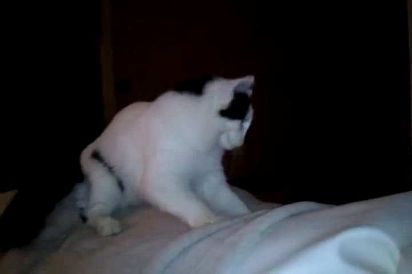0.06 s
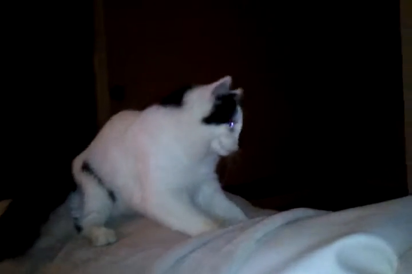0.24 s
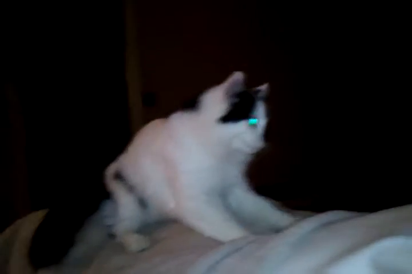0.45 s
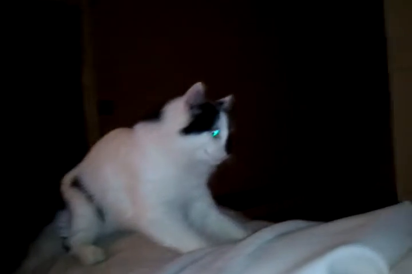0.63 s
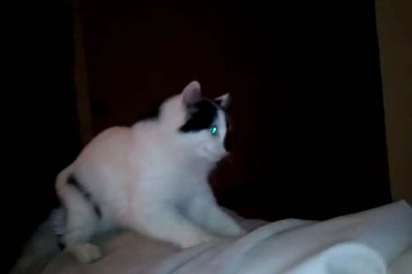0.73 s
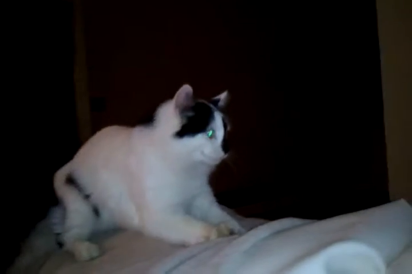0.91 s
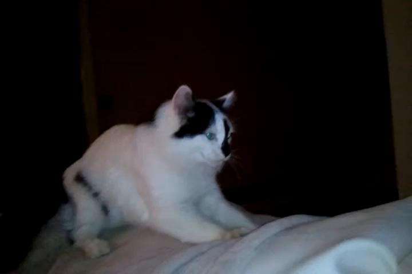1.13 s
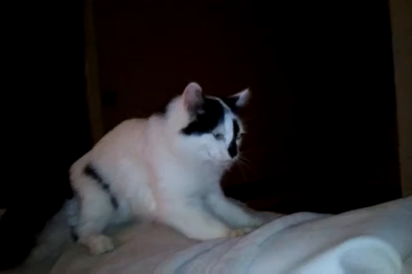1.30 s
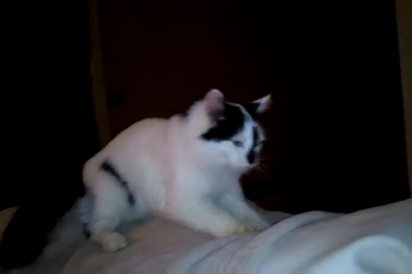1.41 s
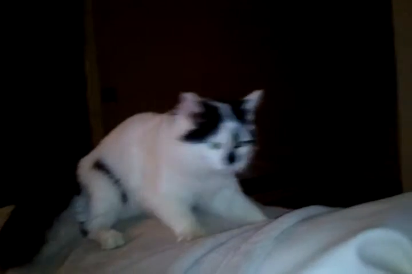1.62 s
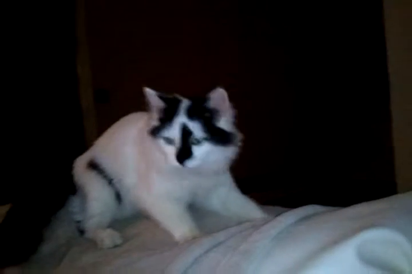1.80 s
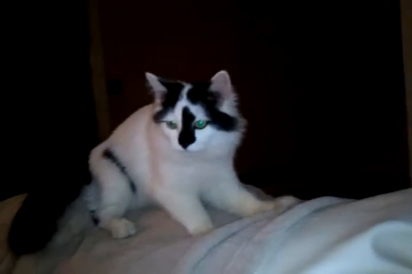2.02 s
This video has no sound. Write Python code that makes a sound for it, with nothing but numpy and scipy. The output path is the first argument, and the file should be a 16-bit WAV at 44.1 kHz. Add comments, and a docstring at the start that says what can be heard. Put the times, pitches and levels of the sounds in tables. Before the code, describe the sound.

Faint cat purring in a quiet room, then a sharp bright scrape of paw on cloth with a weaker second stroke; afterwards the steady purr, low rumble and hiss are clearer, dotted with dry claw clicks.

```python
"""A cat purrs with a low flutter, built from wavering overtones, while it kneads a blanket in a quiet room.
A paw drags over the cloth in two scratchy strokes, made of many tiny thread slips and narrow swishes.
Claws tick as they catch in the weave, and pressing paws give soft low thumps.
Behind them lie rumble and hiss, and a faint ringing that fades away.
The loud scraping opens the recorder's noise gate, so purr and room hiss come up and stay."""
import sys
import numpy as np
from scipy import signal
from scipy.fft import rfft, irfft, next_fast_len
from scipy.io import wavfile
from scipy.ndimage import uniform_filter1d

SR = 44100
rng = np.random.default_rng(int(sys.argv[2]) if len(sys.argv) > 2 else 0)


def materialize(psi):
    """Save the field psi as 16-bit PCM at rate SR to the path in sys.argv[1].

    A 1-D psi becomes a single channel; in a 2-D psi each row is a channel.
    """
    bounded = np.clip(np.atleast_2d(psi).T, -1, 1)
    quanta = np.round(bounded * 32767).astype(np.int16)
    wavfile.write(sys.argv[1], SR, quanta)


N = 90537
T = np.arange(N) / SR  # time of every sample, in seconds

# All levels below are as they stand before the noise gate.
# How the purr changes over time: time_s, flutter_hz, level_db (added to PURR_DB)
PURR_PATH = [(0, 25.67, 1), (.28, 25.61, 1.5), (.52, 26.51, 0.5), (.66, 24.93, -5.5), (.9, 23.92, -6.5),
             (1.06, 23.58, 3), (1.2, 23.85, 1), (1.31, 25.5, -3), (1.44, 26.18, -0.5), (1.6, 26.23, 8),
             (1.69, 26.36, 0), (1.86, 25.74, -4.5), (2.05, 24.3, 0)]
# Overtones of the purr: multiple (of the flutter rate), level_db (against each other)
PURR_OVERTONES = [(2, -2), (3, -17), (4, -12), (5, 0), (6, -5.5), (7, -14), (8, -14.5), (10, -17.5),
                  (12, -18.5)]
PURR_DB = -47
WAVER_DB, PHASE_WAVER_RAD, WAVER_S = 2, 0.3, 0.1  # typical drifts, and the averaging time behind them

# Strokes of the paw on the cloth: start_s, peak_s, end_s, level_db (at the peak),
# rise_db (how far below the peak at the start), fall_db (how far below at the end)
PAW_STROKES = [(0.712, 0.796, 0.8325, -21, 17.5, 33), (.85, 0.877, 0.925, -34.5, 16.5, 14.5)]
# Tone colour of the scrape: pitch_hz, level_db (per Hz, against each other)
SCRAPE_COLOUR = [(100, -15), (300, 3), (700, -2.5), (1500, -1), (2600, 2), (3700, 1), (4700, -3),
                 (6500, -21), (7500, -23)]
FIBRES_PER_S, FIBRE_SPREAD_DB = 5400, 4
SMOOTH_SHARE = 0.65  # smooth rub, against thread slips at 1
# Narrow swishes of sliding cloth: start_s, peak_s, end_s, level_db (at the peak), centre_hz, width_hz
CLOTH_SWISHES = [(0.49, 0.64, 0.7, -42, 640, 230), (.53, .595, .665, -50.5, 5200, 2600),
                 (.658, .682, 0.702, -35, 1390, 170), (0.63, 0.714, 0.87, -44, 1900, 630),
                 (0.701, 0.735, 0.87, -26.5, 5700, 1700), (0.73, .788, 0.8175, -17, 6250, 1094),
                 (.796, .807, .822, -18, 5770, 420), (.835, .868, 0.947, -35, 5960, 1100),
                 (0.847, .95, 0.978, -36.5, 4720, 2050), (0.885, .932, 0.995, -39.5, 3670, 170),
                 (0.87, .925, .975, -44.5, 2960, 240), (.92, 0.99, 1.07, -48, 3980, 640),
                 (0.96, 1.018, 1.064, -48.5, 3050, 300), (0.96, 0.992, 1.096, -51.5, 5800, 1460)]
SWISH_EDGE_DB = 23.5  # how far below its peak a swish is at its start and end

# Claw ticks: time_s, snap_db, ring_db, ring_hz, ring_t60_s (time to fall 60 dB), thud_db, thud_hz
CLAW_TICKS = [(0.698, -27, -45, 3500, 0.0066, -60, 500), (0.8309, -20.5, -32, 3000, 0.0036, -54.5, 500),
              (1.14, -22.5, -35.5, 2180, 0.026, -34.5, 570), (1.2240, -45, -35.5, 2010, 0.02, -40, 500),
              (1.8740, -24, -46, 1490, .008, -43, 560), (1.959, -32, -43, 1511, 0.0099, -29.5, 370),
              (1.9694, -33, -34, 1797, 0.011, -63, 496)]
SNAP_S, THUD_T60_S = 0.00005, 0.019  # time for a snap to peak; time for a thud to fall 60 dB

# Soft thumps of paws pressing into the bedding: time_s (of the middle), level_db, pitch_hz
PAW_PRESSES = [(0.349, -36, 266), (.797, -32, 90), (0.861, -33, 66)]
PRESS_CYCLES = 1  # cycles from the middle of a thump until its swell has shrunk to 1/e

# Faint ringing: centre_hz, width_hz, level_db (at the start, before it fades)
FAINT_RING = [(1360, 290, -49), (1804, 130, -48.5), (2170, 160, -53)]
RING_FADE_DB_PER_S = 35

# Tone colour of the steady room noise: pitch_hz, level_db (per Hz, against each other)
ROOM_COLOUR = [(20, -4.5), (55, -1.5), (90, -0.5), (165, -2.5), (215, -7.5), (330, -10), (520, -10.5),
               (750, -15.5), (1080, -16), (1270, -15), (1450, -17), (1900, -18.5), (2800, -22.5),
               (4500, -23.5), (6400, -24), (7200, -35.5)]
ROOM_DB, ROOM_PATCHY_DB = -43, 0.99

GATE_SHUT_DB, GATE_THRESHOLD_DB = -18, -22.5
GATE_OPEN_S, GATE_EASE_S = 0.083, 0.03  # two time constants that smooth the opening
OFFSET = -0.211  # constant shift of the wave, passed through the gate too
EDGE_HZ = 7520  # top of the recorder's band


def amp(db):
    """Turns decibels into a gain."""
    return 10 ** (np.asarray(db) / 20)


def unit(x):
    """Scales a sound to rms 1."""
    return x / np.sqrt(np.mean(x ** 2) + 1e-20)


def curve(points, column=1):
    """Joins the points of one column by straight lines in time."""
    rows = np.array(points, float)
    return np.interp(T, rows[:, 0], rows[:, column])


def gains(points, hz):
    """Reads the gain at each pitch, spacing pitches as the ear does (log axis)."""
    f, db = np.transpose(points)
    return amp(np.interp(np.log(hz + 1), np.log(f + 1), db))


def colour(x, points):
    """Gives a sound a tone colour by scaling each frequency in it."""
    hz = np.fft.rfftfreq(2 * N, 1 / SR)
    return irfft(rfft(x, 2 * N) * gains(points, hz))[:N]


def band(x, hz, width):
    """Keeps a band around one pitch, with steep sides, at rms 1."""
    size = next_fast_len(N)
    f = np.fft.rfftfreq(size, 1 / SR)
    shape = 1 / (1 + (2 * (f - hz) / width) ** 4) ** 0.5
    return unit(irfft(rfft(x, size) * shape, size)[:N])


def add(mix, s, sound):
    """Mixes a sound in at a time in seconds."""
    part = mix[max(round(s * SR), 0):][:len(sound)]
    part += sound[:len(part)]


def lag(x, seconds):
    """Makes a control follow its target gradually, with a time constant."""
    r = np.exp(-1 / (seconds * SR))
    return signal.lfilter([1 - r], [1, -r], x)


def waver():
    """A slow random drift, made by averaging noise twice, at rms 1."""
    size = max(int(WAVER_S * SR), 2)
    once = uniform_filter1d(rng.standard_normal(N), size)
    return unit(uniform_filter1d(once, size))


def purr():
    """The larynx flutters; the chest passes a few low overtones, each wavering in level and phase."""
    turns = np.cumsum(curve(PURR_PATH)) / SR  # flutter cycles so far
    tone = np.zeros(N)
    for multiple, db in PURR_OVERTONES:
        level = amp(db + WAVER_DB * waver())
        cycles = round(multiple) * turns + rng.random()
        tone += level * np.sin(2 * np.pi * cycles + PHASE_WAVER_RAD * waver())
    return amp(PURR_DB + curve(PURR_PATH, column=2)) * unit(tone)


def fibres():
    """Dense tiny slips of threads, of uneven size, over a smooth rub."""
    happens = rng.random(N) < FIBRES_PER_S / SR
    direction = rng.choice([-1, 1], N)
    size = amp(FIBRE_SPREAD_DB * np.minimum(rng.exponential(1, N), 4))
    slips = happens * direction * size
    return unit(unit(slips) + SMOOTH_SHARE * rng.standard_normal(N))


def arch(start, peak, end, rise_db, fall_db):
    """Swells to a peak and falls off, gently near the top and faster further out."""
    before = np.maximum(peak - T, 0) / max(peak - start, 0.002)
    after = np.maximum(T - peak, 0) / max(end - peak, 0.002)
    return amp(-rise_db * before ** 1.74 - fall_db * after ** 1.66)


def blanket():
    """The paw scrapes over the weave; the taut cloth swishes in narrow bands."""
    strokes = np.zeros(N)
    for start, peak, end, db, rise_db, fall_db in PAW_STROKES:
        strokes += amp(db) * arch(start, peak, end, rise_db, fall_db)
    out = unit(colour(fibres(), SCRAPE_COLOUR)) * strokes
    for start, peak, end, db, hz, width in CLOTH_SWISHES:
        swell = arch(start, peak, end, SWISH_EDGE_DB, SWISH_EDGE_DB)
        out += amp(db) * swell * band(fibres(), hz, width)
    return out


def claws():
    """A claw lets go of a thread: a snap, a short ring and a soft thud."""
    out = np.zeros(N)
    t = T[:SR // 20]
    for s, snap_db, ring_db, ring_hz, ring_t60, thud_db, thud_hz in CLAW_TICKS:
        snap = amp(snap_db) * t / SNAP_S * np.exp(1 - t / SNAP_S)
        short_ring = amp(ring_db - 60 * t / ring_t60) * np.sin(2 * np.pi * ring_hz * t)
        thud = amp(thud_db - 60 * t / THUD_T60_S) * np.sin(2 * np.pi * thud_hz * t)
        add(out, s, snap + short_ring + thud)
    return out


def paws():
    """Each press of a paw gives one soft low thump, a brief swell of a low tone."""
    out = np.zeros(N)
    for s, db, hz in PAW_PRESSES:
        swell = np.exp(-((T - s) * hz / PRESS_CYCLES) ** 2)
        out += amp(db) * swell * np.cos(2 * np.pi * hz * (T - s))
    return out


def ring():
    """A faint mid-range ringing, made of narrow bands of noise, dies away."""
    noise = rng.standard_normal(N)
    bands = sum(amp(db) * band(noise, hz, width) for hz, width, db in FAINT_RING)
    return amp(-RING_FADE_DB_PER_S * T) * bands


def room():
    """Low room rumble and hiss, slightly patchy over time and pitch."""
    _, _, z = signal.stft(rng.standard_normal(N), SR, nperseg=1024, noverlap=768)
    patches = uniform_filter1d(rng.standard_normal(z.shape), size=10, axis=0)  # blur over pitch
    patches = unit(uniform_filter1d(patches, size=12, axis=1))  # blur over time
    patchy = z * amp(ROOM_PATCHY_DB * patches)
    noise = signal.istft(patchy, nperseg=1024, noverlap=768)[1][:N]
    return amp(ROOM_DB) * unit(colour(noise, ROOM_COLOUR))


def scene():
    """Puts the purr, the sounds of the paws and the background together."""
    return (purr() + blanket() + claws() + paws() + ring() + room())[None]


def record(dry):
    """The first loud scrape opens the noise gate, which then stays open; then the top is cut off."""
    level = np.sqrt(abs(uniform_filter1d(dry[0] ** 2, size=700)))  # loudness over about 16 ms
    opened = np.maximum.accumulate(level > amp(GATE_THRESHOLD_DB)) * 1.0  # once open, always open
    opening = lag(lag(opened, GATE_OPEN_S), GATE_EASE_S)
    gain = amp(GATE_SHUT_DB) + (1 - amp(GATE_SHUT_DB)) * opening
    padded = np.pad((dry[0] + OFFSET) * gain, 150, mode="edge")
    low_pass = signal.firwin(301, EDGE_HZ, window=("kaiser", 8), fs=SR)
    return signal.oaconvolve(padded, low_pass, "valid")[None]


dry = scene()
out = record(dry)
materialize(out)
```